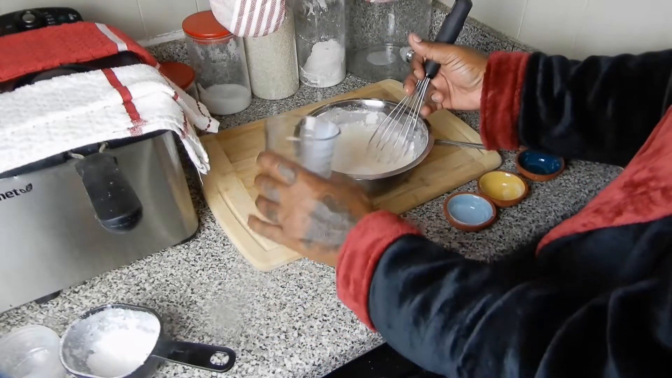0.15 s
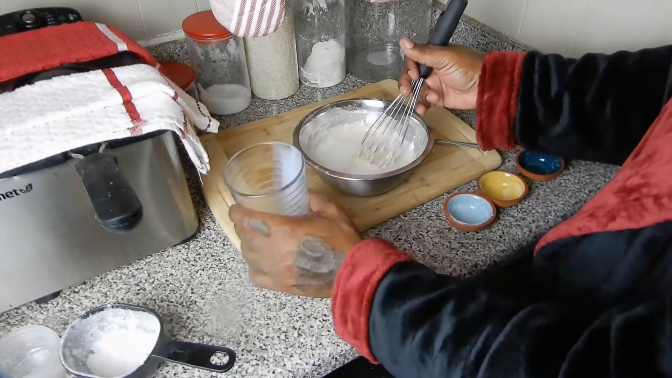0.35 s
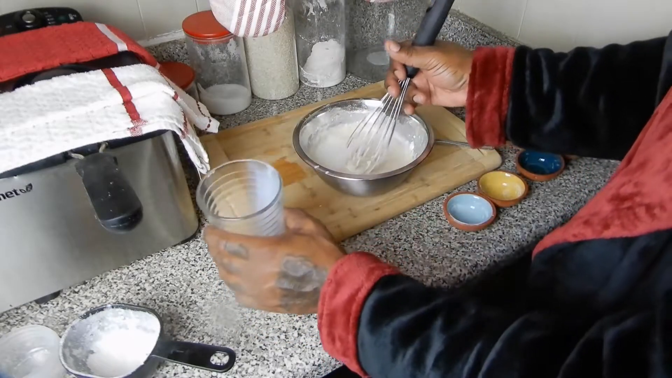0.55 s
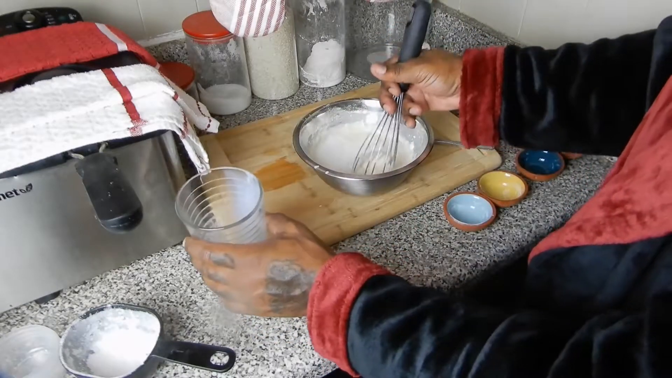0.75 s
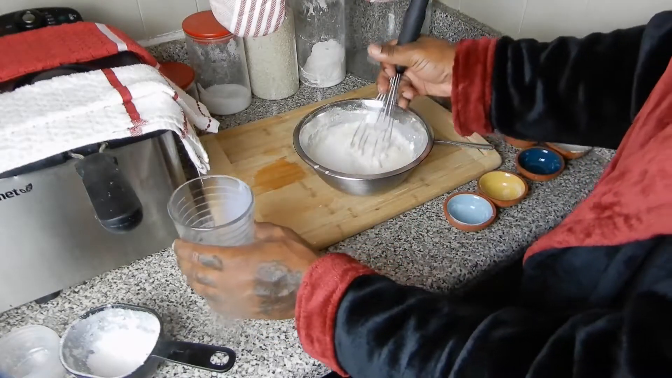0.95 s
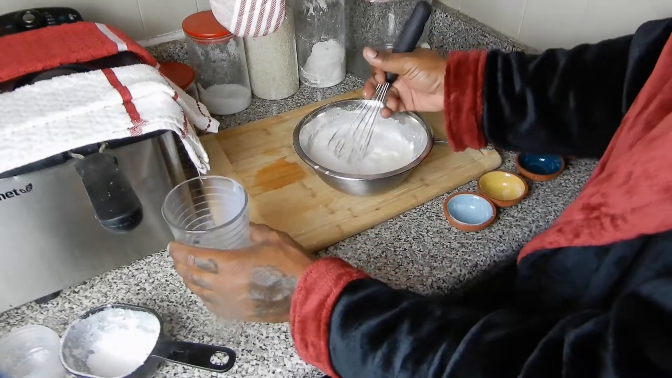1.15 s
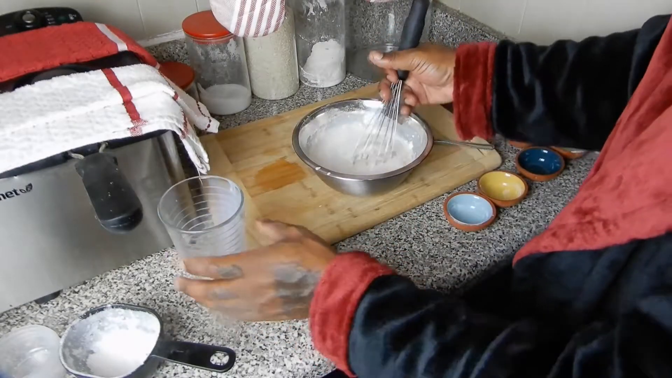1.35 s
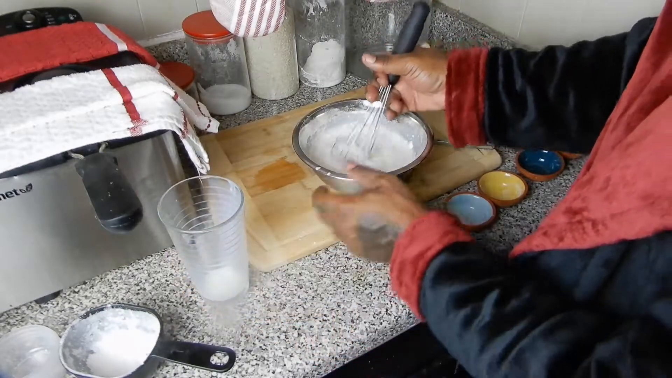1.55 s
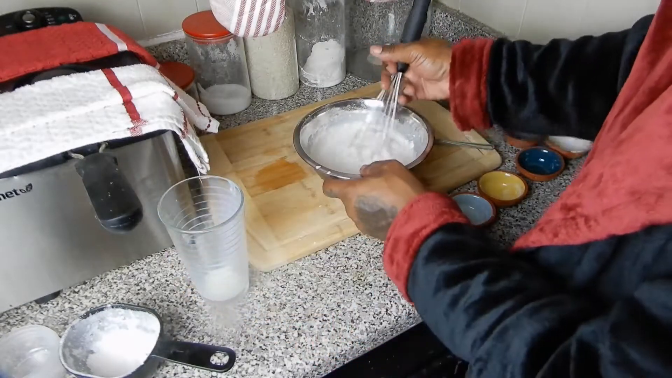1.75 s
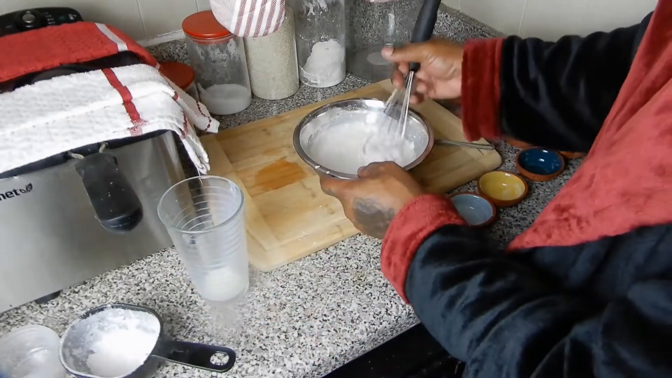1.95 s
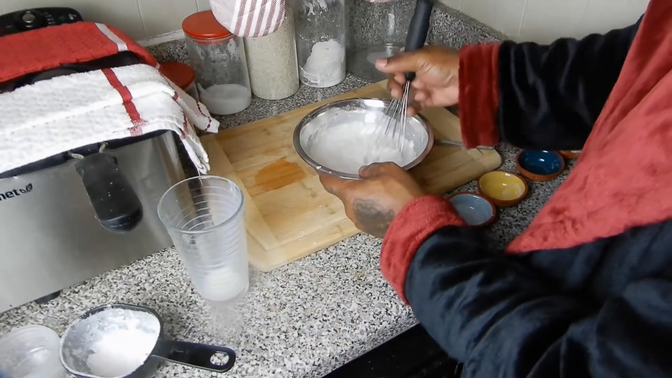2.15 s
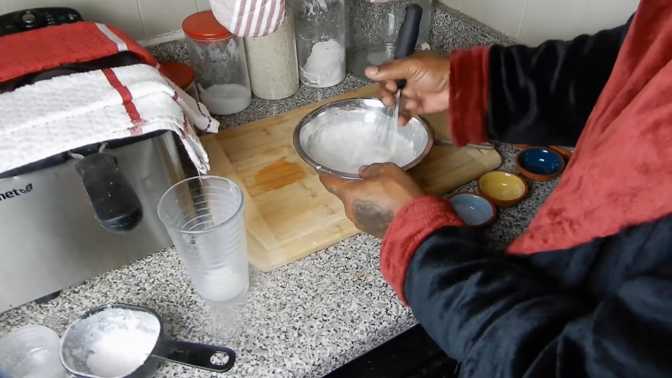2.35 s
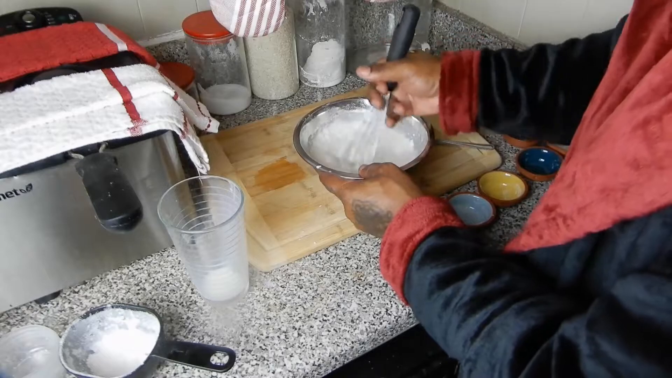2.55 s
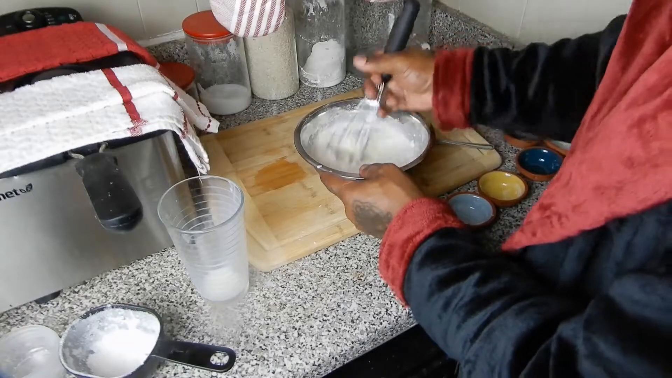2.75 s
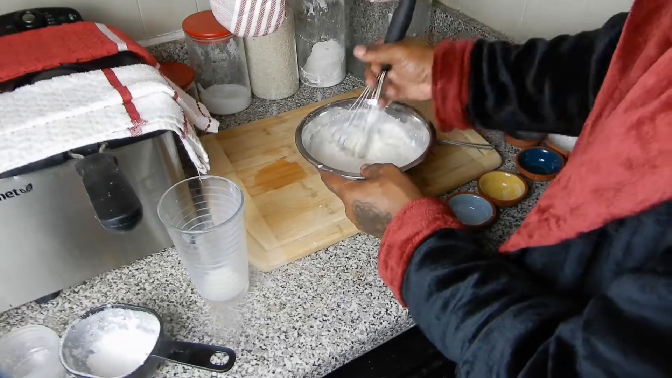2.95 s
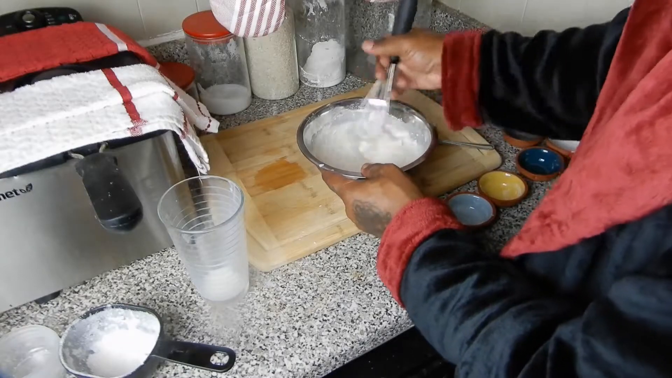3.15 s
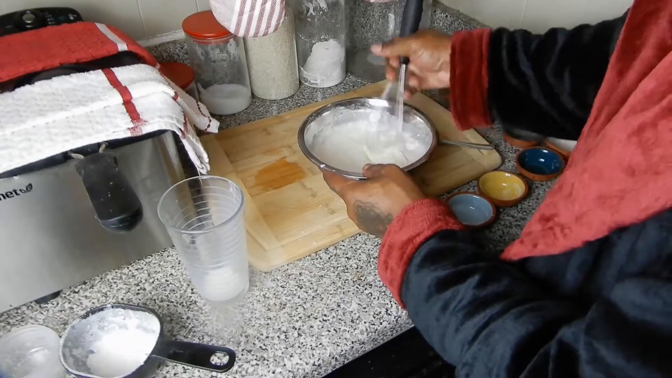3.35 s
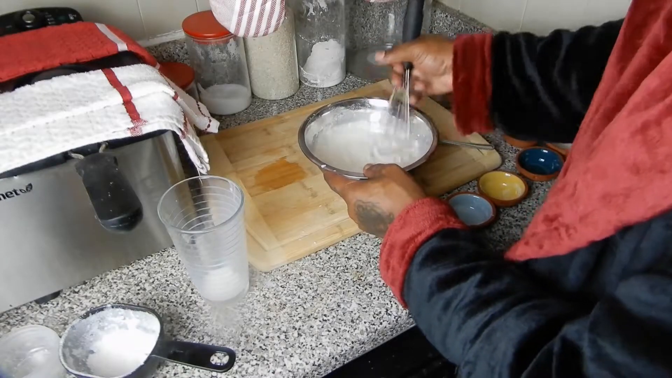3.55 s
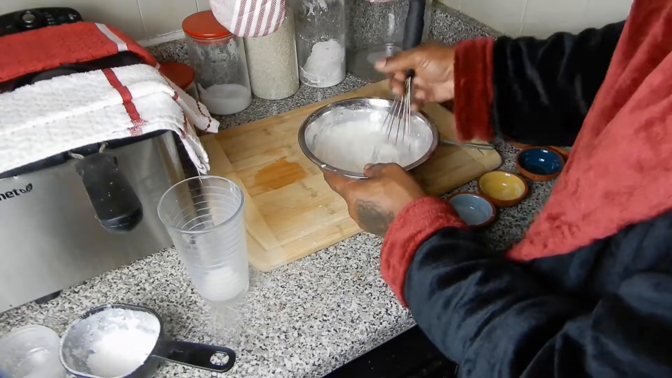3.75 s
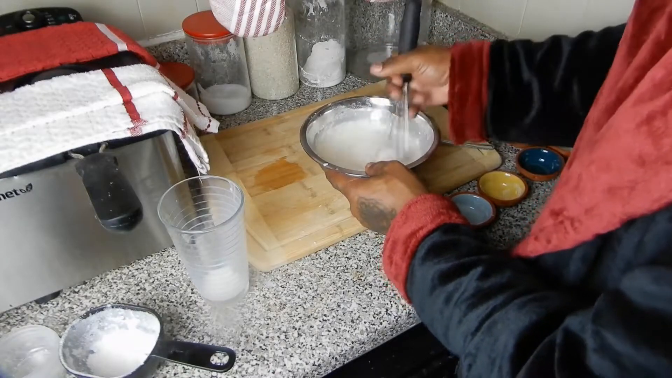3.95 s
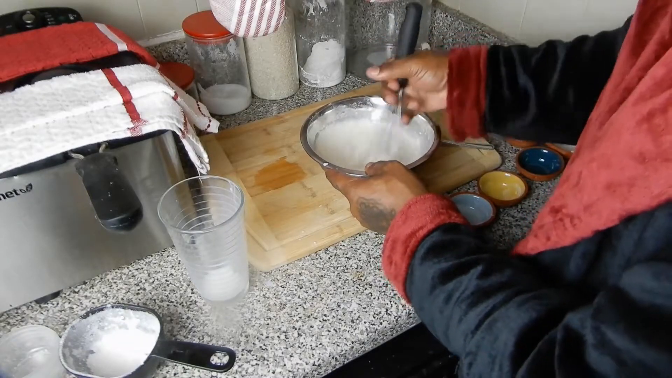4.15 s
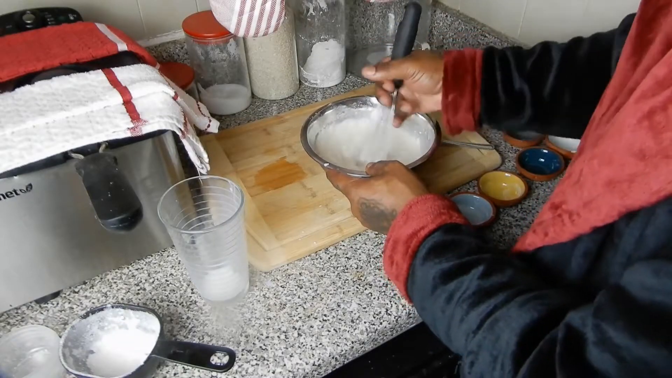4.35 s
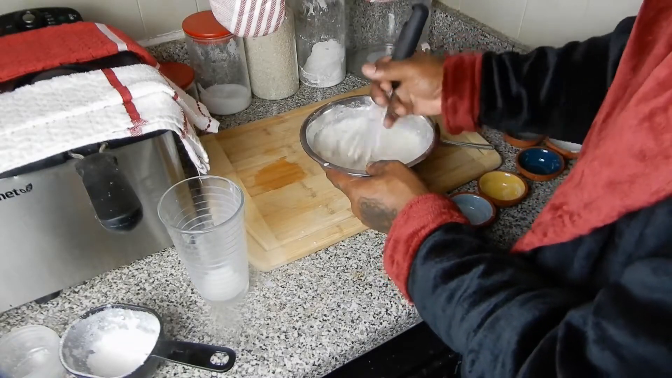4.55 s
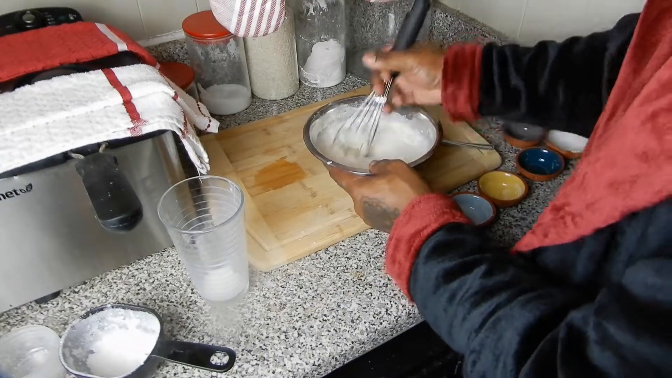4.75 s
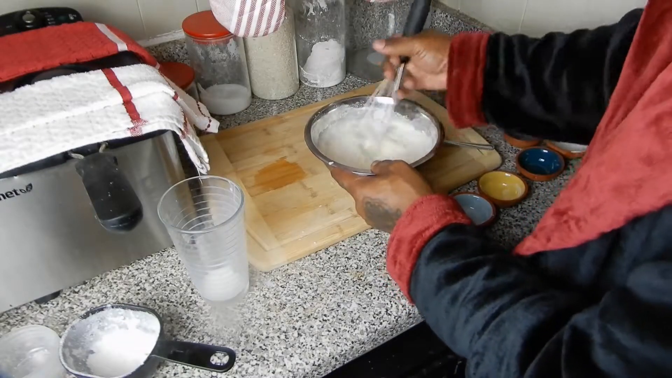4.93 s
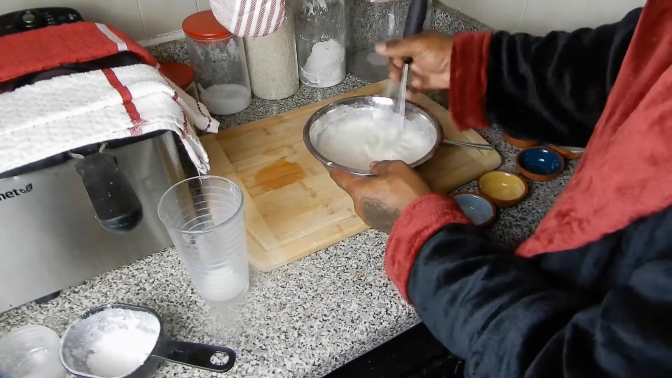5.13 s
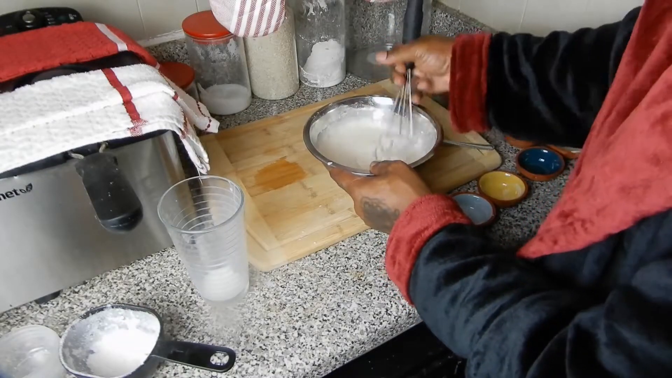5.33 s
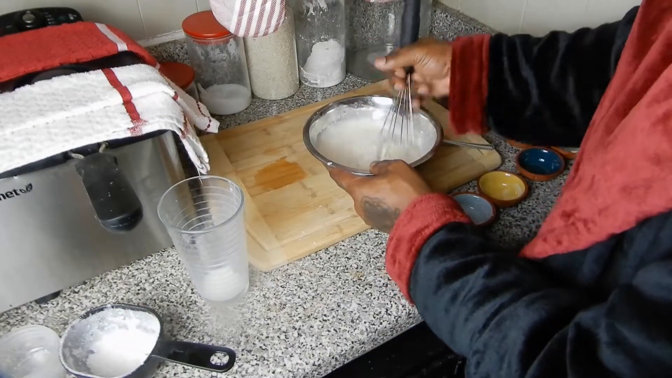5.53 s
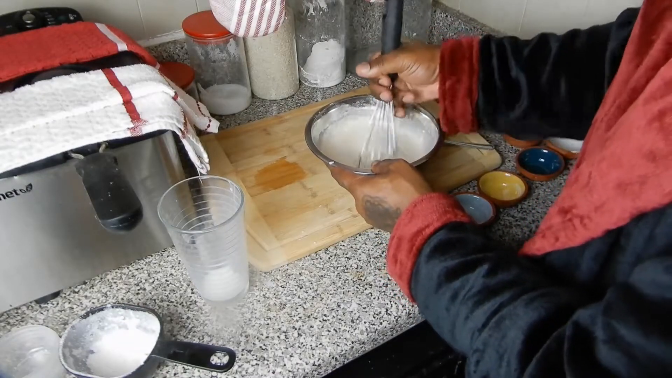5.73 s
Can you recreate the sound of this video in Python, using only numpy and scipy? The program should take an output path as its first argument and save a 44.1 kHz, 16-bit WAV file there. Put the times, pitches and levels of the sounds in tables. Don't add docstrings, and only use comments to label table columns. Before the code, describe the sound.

A close camera microphone in a small, lightly ringing kitchen. Low hum and soft batter slosh begin, with faint wire scrapes. At about 0.43 s a board knocks the stone counter with a woody, cluttery thud; a second, more hollow knock follows at 0.64 s, with small settling sounds. At 1.12 s a tumbler lands hard: a very short, loud crack with quick little rebounds, the loudest event. The stirring drops away and the hum dips until about 1.7 s. Then whisking starts lightly and, from 2.1 s, beats steadily: thin metallic clicks and rattling wires on steel, dull knocks under the batter, wet slosh, airy scraping and fine fizz. Louder strikes stand out near 2.1, 3.95, 4.4 and 4.8 s. The bowl rocks on the board with low thumps and slight counter boom. Strokes crowd closer and grow stronger, still going at the end near 6 s.

```python
import sys
import numpy as np
from scipy import signal
from scipy.io import wavfile
from scipy.ndimage import uniform_filter1d

SR = 44100
rng = np.random.default_rng(int(sys.argv[2]) if len(sys.argv) > 2 else 0)


def field_ratio(decibels):
    return 10 ** (np.asarray(decibels, dtype=float) / 20)


def dump_mix(stems):
    frames = np.atleast_2d(stems).T
    limited = np.clip(frames, -1, 1)
    pcm = np.round(limited * 32767).astype(np.int16)
    wavfile.write(sys.argv[1], SR, pcm)


N = 259749

# time in seconds, effort in dB.
EFFORT = [(0, -2), (.44, 0.5), (.65, 1), (.87, -2.5), (1.02, 1), (1.13, -3), (1.23, -13.5), (1.5, -11),
          (1.76, -3.5), (1.9, -0.5), (2.26, 2), (3.05, 4.5), (3.77, 4.5), (4.12, 3), (4.54, 6), (5.02, 3.5),
          (5.56, 6.5), (5.89, 4.5)]
# frequency in Hz, level in dB per Hz.
SLOSH_SPECTRUM = [(18, -57), (30, 13.5), (75, -12), (126, -4.5), (223, 5.5), (388, -2.5), (466, 1),
                  (994, -7.5), (1100, -7), (1350, -10.5), (1840, -14), (3540, -24.5), (4000, -34),
                  (5200, -36), (8800, -120)]
# frequency in Hz, level in dB per Hz.
SCRAPE_SPECTRUM = [(880, -58.5), (1500, 0), (1850, -7), (3100, -10), (3540, -9), (3940, -13.5),
                   (4350, -10.5), (5280, -9.5), (9500, -13.5), (12400, -23.5), (20900, -120)]
# frequency in Hz, level in dB per Hz.
FIZZ_SPECTRUM = [(8000, -42), (9600, -10), (11000, -3), (15500, -3.5), (16500, -34)]
# frequency in Hz, likeness from 0 to 1.
CHANNEL_LIKENESS = [(60, 0.87), (150, 0.84), (380, 0.87), (950, 0.88), (2380, 0.78), (5980, 0.81),
                    (15000, 1)]
# time in seconds, level in dB.
WHINE_LEVEL = [(0, -76), (1.1, -76), (1.15, -120), (1.33, -110), (1.38, -88), (2.1, -82)]

# start in seconds, peak in dB, depth (dull against bright) in dB.
EASY_STROKES = [(.0976, -45, -21), (.1314, -40.5, -24), (.1934, -43, 0), (1.7125, -52, -4),
                (1.8227, -45.5, 1), (2.042, -42.5, 3), (2.07, -37, -3), (2.2281, -51, -10), (2.369, -43, 7),
                (2.3864, -40.5, 6), (2.5338, -37, -5), (2.5505, -34.5, -1), (3.0572, -33, -1),
                (3.0776, -35, 11.5), (3.175, -37, -21), (3.2188, -37.5, -16), (3.304, -41.5, 12.5),
                (3.4503, -36.5, 8), (3.4786, -45, -4), (3.6364, -36.5, -14), (4.147, -32, -2),
                (4.48, -39, -11)]
# start in seconds, peak in dB, depth in dB.
FLICKS = [(.172, -47, -5), (.184, -53, -23), (2.4202, -45, -15), (2.595, -32.5, -7), (2.6196, -35.5, 3),
          (2.8164, -37.5, 4), (2.8492, -35, 1.5), (3.272, -39, -10), (3.3546, -59, 8), (3.5072, -37.5, 2.5),
          (3.783, -38, -3), (4.5537, -41, 7), (4.8177, -28.5, -1), (5.0681, -42.5, 12), (5.0841, -33.5, 6),
          (5.541, -33, 1), (5.5585, -34.5, -13), (5.6239, -26, -0.5)]
# start in seconds, peak in dB, depth in dB, rattle t60 in seconds.
IDLE_STROKES = [
    (.863, -36.5, -17, 0.056),
    (1.075, -51, -8, 0.059),
    (1.099, -25.5, 0, 0.21),
    (1.1184, -18, -8, 0.011),
]
# start in seconds, peak in dB, depth in dB,
# rattle t60 in seconds.
STEEL_STRIKES = [(2.1079, -37, -26, 0.14), (2.1238, -14, -10.5, 0.02), (2.254, -42.5, -22, 0.045),
                 (2.4566, -42, -13, 0.12), (2.8896, -35.5, 0, 0.12), (2.966, -39, 1.5, .044),
                 (3.258, -38, -24, 0.066), (3.6658, -30.5, -4, 0.019), (3.7404, -24.5, -3, 0.033),
                 (3.8594, -38.5, -7, 0.065), (3.927, -32.5, -23, 0.22), (3.9458, -14.5, -20, 0.033),
                 (3.951, -13.5, -8.5, 0.059), (3.9845, -38, -13, 0.026), (4.1818, -20.5, -10.5, 0.042),
                 (4.392, -29, -12, 0.026), (4.3976, -18.5, -7.5, 0.085), (4.4186, -30.5, -3, .021),
                 (4.6205, -21.5, -3.5, 0.068), (4.7229, -31.5, -25, 0.042), (4.8326, -13.5, -15, 0.048),
                 (4.928, -50, -16, 0.056), (5.0934, -32.5, -11, 0.031), (5.1792, -25.5, -21, 0.064),
                 (5.336, -33, -16, 0.043), (5.857, -22.5, -4, 0.056)]
# start in seconds, peak in dB, depth in dB, rattle t60 in seconds.
BRISK_STROKES = [(3.89, -27, 0.5, 0.072), (4.1973, -28, -2.5, 0.039), (4.335, -46.5, 14.5, 0.1),
                 (4.634, -41.5, 18, 0.058), (4.8195, -37, 9.5, 0.058), (4.863, -48, 12.5, 0.015),
                 (4.78, -31.5, 4.5, .08), (4.79, -30.5, 8.5, 0.031), (4.9532, -35.5, -15, 0.057),
                 (5.0167, -26.5, 2, 0.048), (5.2288, -33.5, 12.5, 0.078), (5.3226, -30.5, 9, 0.036),
                 (5.4038, -30.5, 3.5, 0.092), (5.5495, -31.5, 9, 0.033), (5.4538, -32, 7.5, 0.085),
                 (5.4945, -27.5, 4, 0.045), (5.6774, -34, 9, 0.066), (5.7116, -29.5, 1.5, 0.085),
                 (5.751, -33, 0, 0.025), (5.7613, -28.5, 6.5, 0.02), (5.799, -32, 7.5, 0.043)]
# frequency in Hz, width in Hz, level in dB.
STEEL_MODES = [(2450, 140, -5.5), (3377, 140, -0.5), (3790, 74, -3), (4330, 216, -3.5), (5580, 215, 0),
               (6155, 190, -1.5), (6610, 210, -3), (7110, 124, -2), (7360, 330, -4.5), (7760, 280, -1),
               (9090, 270, -7.5), (9630, 97, -11)]
# frequency in Hz, width in Hz, level in dB.
DAMPED_MODES = [(600, 42, 1.1), (930, 1090, 8), (1415, 89, 11.8), (1567, 24, 13.1), (2133, 350, 1.9)]
# frequency in Hz, width in Hz, level in dB.
WIRE_MODES = [(9600, 3700, -1.4), (11100, 2000, -0.57), (12400, 1800, -0.34), (13500, 2700, -1),
              (14400, 2500, -0.16)]

# start in seconds, peak in dB,
# contact time in ms, clatter t60 in seconds.
FIRST_KNOCK = [(.429, -19, 0.081, 0.059), (.4312, -3.5, 0.6, 0.03), (.4355, -14, 0.4, 0.0064),
               (.451, -20, 0.62, 0.019), (.472, -13.5, 0.86, 0.028), (.512, -31, 1, 0.014),
               (.535, -42, 1, 0.04), (.74, -33, 1, .1), (.79, -28.5, 0.35, 0.18), (.82, -29, 0.36, 0.37),
               (.866, -33, 0.33, 0.027)]
# start in seconds, peak in dB, contact time in ms, clatter t60 in seconds.
SECOND_KNOCK = [
    (.6345, -16.5, 0.073, 0.0098),
    (.637, -7, 0.15, 0.045),
    (.69, -25, 1, 0.068),
]
# start in seconds, peak in dB, contact time in ms, clatter t60 in seconds.
TUMBLER_SET_DOWN = [
    (1.1125, -19.5, 0.055, 0.03),
    (1.1185, 1.5, 0.1, 0.0033),
    (1.13, -9.5, 0.26, 0.01),
    (1.141, -13.5, 0.26, .01),
    (1.152, -19.5, 0.34, 0.018),
]
# frequency in Hz, level in dB, t60 in seconds.
FIRST_MODES = [(91.2, -12.5, 0.35), (169, -5.5, 0.062), (237, 0, 0.035), (406, 2, 0.036),
               (464, -4.5, 0.053), (636, 1.5, 0.038), (1090, -2.5, 0.021), (1335, -2.5, 0.014),
               (1860, -9, 0.016), (2200, -6.5, 0.019), (3100, -1, 0.0071), (3900, -6.5, 0.012),
               (4730, -5.5, 0.0084)]
# frequency in Hz, level in dB, t60 in seconds.
SECOND_MODES = [(90.3, -5.5, 0.35), (215, 7.5, 0.074), (484, -0.5, 0.14), (536, 8.5, 0.019),
                (633, 21, 0.018), (667, 14, 0.036), (930, 0, 0.014), (1150, 10, 0.012), (1445, 8.5, 0.01),
                (1910, -1.5, 0.0092), (2370, -8, 0.013)]
# frequency in Hz, level in dB, t60 in seconds.
TUMBLER_MODES = [(215, -8.5, 0.15), (295, -10, .1), (384.7, 1.5, 0.1), (480, 7, 0.077), (607, -8.5, 0.13),
                 (707, -10.5, 0.2), (756, -0.5, 0.073), (917, 8, 0.013), (996, -0.5, 0.087),
                 (1280, 6, 0.019), (2180, -2, 0.0093), (3040, -6, 0.013), (4770, -2.5, 0.0098),
                 (5900, -2, 0.006)]
# frequency in Hz, t60 in seconds.
KITCHEN_T60 = [(100, 0.25), (400, 0.38), (750, 0.69), (2500, 0.61), (5000, 0.17), (12000, 0.11)]
# frequency in Hz, level in dB.
TAIL_SIDE = [(100, -68.0), (1000, -22), (4000, -4.0), (12000, -3.5)]

# start in seconds, peak in dB, pitch in Hz, t60 in seconds.
SLAPS = [(2.117, -32, 482, 0.55), (2.254, -25, 500, 0.2), (2.371, -24.5, 676, 0.28),
         (2.605, -23, 640, 0.11), (2.97, -25, 600, 0.39), (3.073, -25.5, 600, .21), (3.268, -26, 744, 0.15),
         (3.631, -23, 460, 0.076), (3.73, -24, 476, 0.19), (3.98, -28, 565, 0.072),
         (4.332, -20, 590, 0.038), (4.629, -23, 600, 0.29), (4.779, -21, 600, 0.083),
         (5.019, -18, 558, 0.13), (5.179, -22.5, 717, 0.25), (5.228, -21.5, 620, 0.14),
         (5.314, -23.5, 430, 0.23), (5.546, -22, 620, 0.12), (5.673, -18, 600, 0.029),
         (5.755, -19, 626, 0.033)]
# start in seconds, peak in dB, pitch in Hz, t60 in seconds.
ROCKS = [(2.516, -30, 190, 0.11), (2.714, -24, 217, 0.31), (2.833, -26.5, 220, 0.15),
         (3.193, -19, 218, 0.34), (3.41, -26, 168, 0.5), (3.516, -27, 215, 0.28), (3.576, -27, 210, 0.23),
         (3.848, -24.5, 218, 0.2), (3.884, -18.5, 159, 0.085), (4.147, -46, 222, 0.066),
         (4.284, -26.5, 272, 0.08), (4.419, -25.5, 240, 0.21), (4.498, -23, 237, 0.11),
         (4.545, -21.5, 218, 0.18), (4.723, -20.5, 205, 0.067), (5.422, -13.5, 168, 0.17),
         (5.62, -18, 207, 0.15), (5.799, -18, 296, 0.055), (5.86, -14, 205, 0.015)]
# frequency in Hz, width in Hz, level in dB.
SEAT_MODES = [(218, 11, 6), (374.3, 16, -7), (476.4, 12, 2), (600, 27, -6), (684, 45, -6), (934, 83, -8.5),
              (1434, 30, -12)]
# frequency in Hz, width in Hz, level in dB.
COUNTER_MODES = [(86, 11.7, -1.5), (76, 15.5, -8)]
# start in seconds, peak in dB, pitch in Hz.
CLUMPS = [(2.3694, -33, 1080), (2.3869, -33, 1260), (2.5944, -31, 1150), (2.6079, -33, 1290),
          (2.6199, -24.5, 1320), (2.8234, -31, 1190), (2.8494, -37, 1360), (2.8898, -47, 999),
          (3.0783, -23, 1350), (3.2195, -40, 990), (3.2734, -23, 925), (3.3043, -29, 969),
          (3.444, -27, 1400), (3.5173, -26, 995), (3.7398, -29, 1024), (3.8391, -31, 1580),
          (3.8875, -38, 1290), (3.9289, -23, 926), (3.9528, -21, 1280), (4.1479, -36, 1020),
          (4.1813, -22.5, 1040), (4.3345, -28, 1180), (4.3973, -36, 960), (4.5605, -41, 966),
          (4.6168, -25, 1050), (4.7845, -24, 960), (4.8194, -15, 940), (4.8618, -30, 1000),
          (4.9331, -30, 1020), (5.0144, -25, 1380), (5.0713, -38, 904), (5.0843, -27, 1600),
          (5.2319, -26, 1390), (5.2763, -26.5, 970), (5.3227, -24, 1420), (5.405, -18, 930),
          (5.4514, -26, 1570), (5.4953, -27, 1570), (5.5487, -23, 1270), (5.6255, -28, 1600),
          (5.6684, -24, 930), (5.7118, -18, 1566), (5.7503, -22, 1290), (5.7982, -23, 930),
          (5.8495, -16, 930)]

LEAD_S = 0.03
BEAT_S = 1.76


def evened(x):
    return x / np.sqrt(np.mean(x ** 2) + 1e-20)


def peaked(x):
    return x / (abs(x).max() + 1e-20)


def read(points, hz):
    f, value = np.transpose(points)
    return np.interp(np.log(hz + 1), np.log(f + 1), value)


def curve(rows):
    seconds, db = np.transpose(rows)
    return np.interp(np.arange(N) / SR, seconds, db)


def add(mix, s, sound):
    part = mix[round(s * SR):][:len(sound)]
    part += sound[:len(part)]


def lowpass(x, order, hz):
    return signal.sosfilt(signal.butter(order, hz, fs=SR, output="sos"), x)


def ring(peaks, spread_db, detune, size=1500):
    hz, width, db = np.transpose(peaks)[:, :, None]
    share, shift = rng.standard_normal((2, len(hz), 1))
    t = np.arange(size) / SR
    sign = (-1) ** np.arange(len(hz))[:, None]
    decay = field_ratio(db + spread_db * share) * width * np.exp(-np.pi * width * t)
    modes = sign * decay * np.sin(2 * np.pi * hz * (1 + detune * shift) * t)
    return modes.sum(0)


def rattle(t60, per_s, fizz, first, drag_s):
    t = np.arange(4000) / SR - LEAD_S
    wires = (rng.random(len(t)) < per_s / SR) * rng.standard_normal(len(t))
    wires[round(LEAD_S * SR)] = first
    drag = 0.75 * np.exp(np.minimum(t, 0) / drag_s)
    fade = field_ratio(-60 * t / max(t60, 0.004))
    return (wires + fizz * rng.standard_normal(len(t))) * np.where(t < 0, drag, fade)


def noise(spectrum, size, patchy_db, flicker_db):
    hz = np.fft.rfftfreq(size, 1 / SR)
    frames = N // (size // 4) + 5
    a, b, c, d, patches = rng.standard_normal((frames, len(hz), 5)).T
    patches = uniform_filter1d(patches, size=5, axis=0)
    patches = evened(uniform_filter1d(patches, size=9, axis=1))
    flicker = evened(uniform_filter1d(rng.standard_normal(frames), size=3))
    same = np.clip(read(CHANNEL_LIKENESS, hz), 0, 1)[:, None]
    mid = np.sqrt(1 + same) * (a + 1j * b)
    side = np.sqrt(1 - same) * (c + 1j * d)
    level_db = read(spectrum, hz)[:, None] + patchy_db * patches + flicker_db * flicker
    z = np.array([mid + side, mid - side]) * field_ratio(level_db)
    return evened(signal.istft(z, nperseg=size, noverlap=3 * size // 4)[1][:, :N])


def strokes():
    # rows, shared rattle t60 (s) where the rows have none, wire hiss (dB) for a stroke of -30 dB
    kinds = [(IDLE_STROKES, (), -19.5), (STEEL_STRIKES, (), -4.5), (BRISK_STROKES, (), -15),
             (EASY_STROKES, (0.05,), -35), (FLICKS, (0.055,), -0.5)]
    found = []
    for rows, t60, hiss_db in kinds:
        for row in rows:
            found.append((*row, *t60, hiss_db - 0.47 * (row[1] + 30)))
    return found


def contact(width_s):
    marks = np.zeros(N)
    for row in strokes():
        marks[round(row[0] * SR)] = 1
    t = np.arange(-4000, 4001) / SR
    return np.tanh(signal.oaconvolve(marks, np.exp(-(t / width_s) ** 2), "same"))


def grazes():
    per_s, fade_s = 47, 0.0036
    hits = (rng.random(N) < per_s / SR) * rng.exponential(1, N)
    lift = np.log1p(signal.lfilter([1], [1, -np.exp(-1 / (fade_s * SR))], hits))
    return evened(lift - lift.mean())


def gain_duck_db():
    after = np.maximum(np.arange(N) / SR - 1.31, 0) / 0.27
    return -6 * (after * np.exp(1 - after)) ** 2


def stirring():
    t = np.arange(N) / SR
    touch = contact(width_s=0.036) - 0.5
    effort_db = curve(EFFORT)
    graze = grazes()

    heard_db = np.maximum(effort_db, -17)
    slosh_db = -44 + 0.23 * heard_db + gain_duck_db() + 0.53 * touch
    slosh = field_ratio(slosh_db) * noise(SLOSH_SPECTRUM, size=1024, patchy_db=1.0, flicker_db=1.0)

    scrape = noise(SCRAPE_SPECTRUM, size=256, patchy_db=2.5, flicker_db=1.14)
    scrape = np.where(t < BEAT_S, lowpass(scrape, 2, 7500), scrape)
    scrape_db = -57 + 1.58 * effort_db + 1.1 * touch + 0.8 * graze

    idle_db = -12 * np.clip((BEAT_S + 0.093 - t) / 0.17, 0, 1)
    fizz_db = -66.5 + 0.97 * effort_db + idle_db + 4.3 * touch + 2.8 * graze * (t > BEAT_S)
    fizz = noise(FIZZ_SPECTRUM, size=512, patchy_db=2.2, flicker_db=0.5)
    return slosh + field_ratio(scrape_db) * scrape + field_ratio(fizz_db) * fizz


def whine():
    wobble_hz = 45 * evened(uniform_filter1d(rng.standard_normal(N), size=300))
    return field_ratio(curve(WHINE_LEVEL)) * np.sin(2 * np.pi * np.cumsum(12480 + wobble_hz) / SR)


def whisk():
    out = np.zeros((2, N))
    bunch_s = 0.00097
    for s, db, dull_db, t60, hiss_db in strokes():
        first = np.clip((db + 36.0) / 12, 0, 1.15)
        sunk = np.clip(dull_db + 8, 0, 14)
        steel = [(hz, 2.77 * width, g - 0.89 * sunk * np.log2(hz / 3500)) for hz, width, g in STEEL_MODES]
        drive = rattle(t60, per_s=900, fizz=0.2, first=first, drag_s=0.004 / (1 + 0.4 * first))
        t = np.arange(len(drive)) / SR - LEAD_S
        bunch = (t > 0) * np.exp(-abs(t) / bunch_s) * rng.standard_normal(len(t))
        drive = drive + 0.45 * first * bunch
        bright = peaked(signal.fftconvolve(drive, ring(steel, spread_db=2.5, detune=0.015)))
        dull = peaked(signal.fftconvolve(drive, ring(DAMPED_MODES, spread_db=2.5, detune=0.03)))
        hiss = peaked(signal.fftconvolve(drive, ring(WIRE_MODES, spread_db=3, detune=0.02)))
        lean_db = np.clip(1.6 * rng.standard_normal(), -1.7, 1.7) + 0.1
        for side, ear in zip((1, -1), out):
            top = bright + field_ratio(hiss_db + side * (lean_db - 1.5)) * hiss
            stroke = field_ratio(side * lean_db) * (top + field_ratio(dull_db) * dull)
            add(ear, s - LEAD_S, field_ratio(db) * stroke)
    return out


def knocks(blows, modes):
    out = np.zeros(N)
    t = np.arange(SR // 2) / SR
    body = np.zeros(len(t))
    for k, (hz, db, t60) in enumerate(modes):
        body += (-1) ** k * field_ratio(db - 60 * t / t60) * np.sin(2 * np.pi * hz * t)
    for s, db, contact_ms, clatter_s in blows:
        push = np.sin(np.pi * np.clip(t[:200] / (max(contact_ms, 0.04) / 1000), 0, 1))
        clatter = rattle(clatter_s, per_s=500, fizz=0.04, first=2, drag_s=0.001)
        drive = np.convolve(clatter, push)
        add(out, s - LEAD_S, field_ratio(db) * peaked(signal.fftconvolve(body, drive)))
    return out


def scattered(x, share):
    flutter = evened(lowpass(rng.standard_normal(N), 4, 150))
    return lowpass(x, 2, 1130) * (np.sqrt(1 - share) + np.sqrt(share) * flutter)


def kitchen(x):
    taps = np.zeros((2, SR))
    at = np.arange(200, SR - 20, 20) + rng.integers(0, 20, (2, (SR - 201) // 20))
    np.put_along_axis(taps, at, rng.choice([-1., 1.], at.shape), 1)
    hz, t, z = signal.stft(taps, SR, nperseg=256)
    mid, side = z * field_ratio(-60 * t / read(KITCHEN_T60, hz)[:, None])
    side = side * field_ratio(read(TAIL_SIDE, hz))[:, None]
    tail = signal.istft(np.array([mid + side, mid - side]), SR, nperseg=256)[1]
    return signal.fftconvolve(x[None], tail / np.linalg.norm(tail[0]), axes=1)[:, :N]


def bowl():
    out = np.zeros(N)
    for thumps, boom_db in ((SLAPS, -18.5), (ROCKS, -15)):
        for s, db, hz, t60 in thumps:
            drive = rattle(t60, per_s=490, fizz=0.15, first=0.36, drag_s=0.007)
            modes = SEAT_MODES + [(hz, 70., 2.5)]
            seat = signal.fftconvolve(drive, ring(modes, spread_db=3.5, detune=0.03, size=9000))
            boom = signal.fftconvolve(drive, ring(COUNTER_MODES, spread_db=1, detune=0.01, size=9000))
            add(out, s - LEAD_S, field_ratio(db) * (peaked(seat) + field_ratio(boom_db) * peaked(boom)))
    return out


def clumps():
    out = np.zeros((2, N))
    for s, db, hz in CLUMPS:
        drive = rattle(0.031, per_s=470, fizz=0.052, first=1.0, drag_s=0.0017)
        patch = ring([(hz, 56, 0)], spread_db=0, detune=0)
        sound = peaked(signal.fftconvolve(drive, patch))
        lean_db = 1.5 * rng.standard_normal()
        for side, ear in zip((1, -1), out):
            add(ear, s - LEAD_S, field_ratio(db - 8.5 + side * lean_db) * sound)
    return out


def scene():
    steady = stirring() + whine()
    blows = knocks(FIRST_KNOCK, FIRST_MODES) + knocks(SECOND_KNOCK, SECOND_MODES)
    blows = blows + knocks(TUMBLER_SET_DOWN, TUMBLER_MODES)
    beats = whisk() + field_ratio(-6.5) * bowl() + clumps()
    direct = (blows + beats) * field_ratio(np.array([[0.2], [-0.2]]))
    room = kitchen(field_ratio(-10) * scattered(blows, share=0.38) + field_ratio(-12) * beats.mean(0))
    return direct + room + steady


def band_limit(x):
    return signal.sosfilt(signal.butter(12, 16970, fs=SR, output="sos"), x)


def record(dry):
    low = signal.sosfilt(signal.butter(4, 65, "high", fs=SR, output="sos"), dry)
    top_edge = signal.firwin(255, 15850, window=("kaiser", 4), fs=SR)
    band = signal.oaconvolve(low, top_edge[None], "same")
    band = band + field_ratio(-41) * (low - band)
    limited = 1.1 * np.tanh(band / 1.1)
    return band_limit(limited)


dry = scene()
out = record(dry)
dump_mix(out)
```